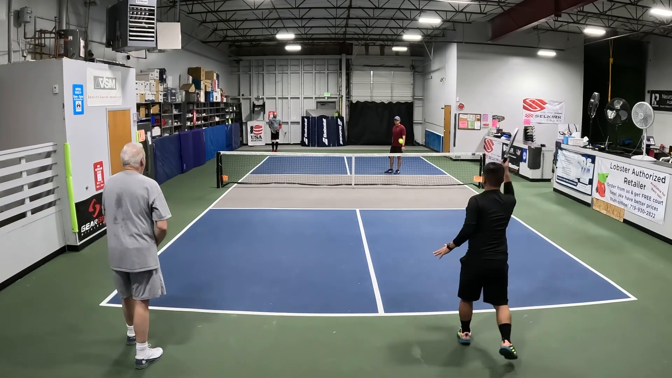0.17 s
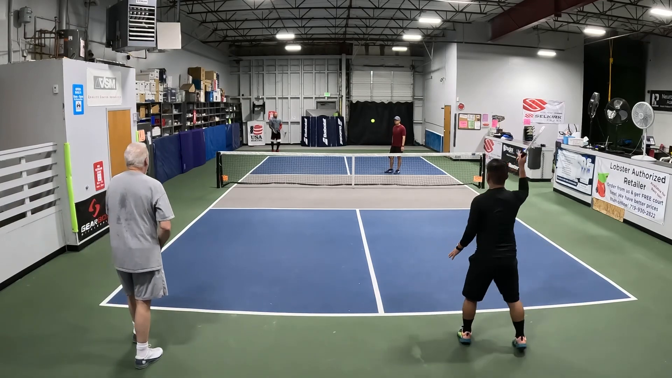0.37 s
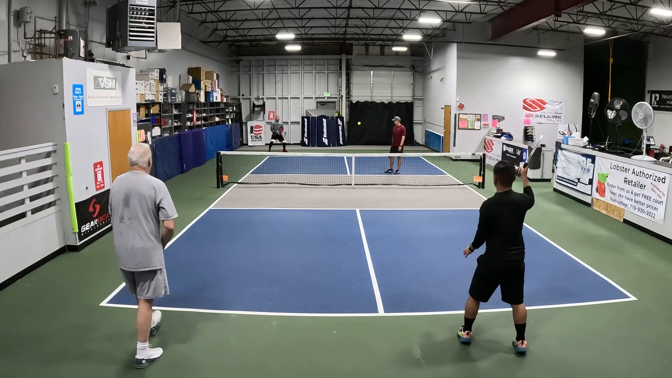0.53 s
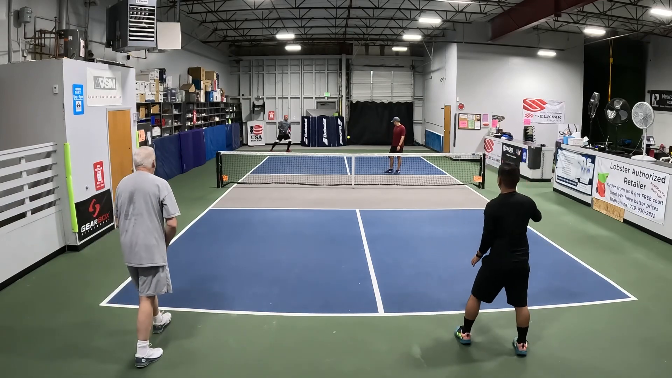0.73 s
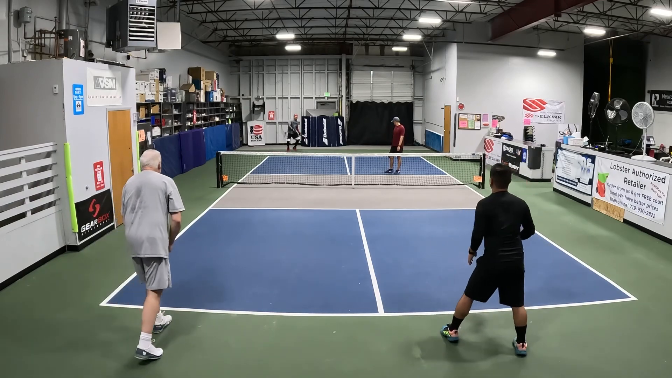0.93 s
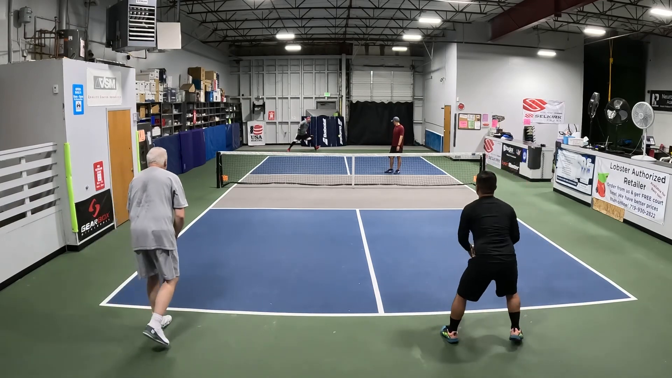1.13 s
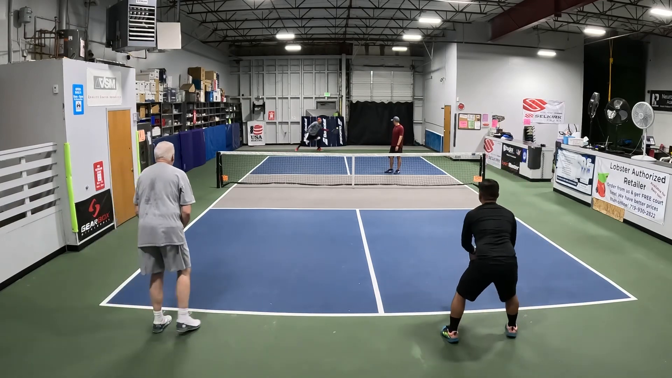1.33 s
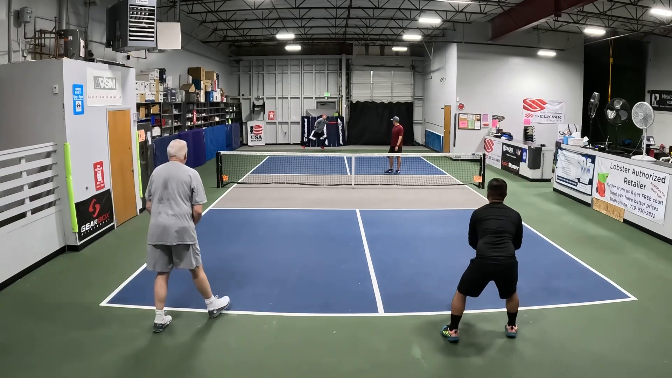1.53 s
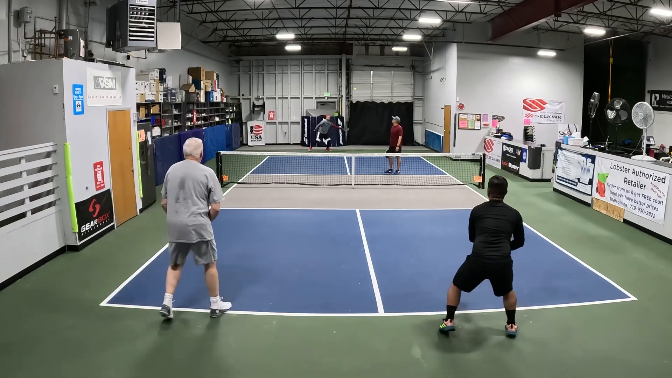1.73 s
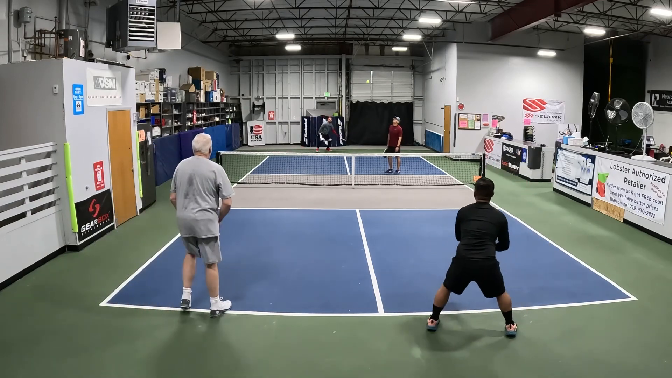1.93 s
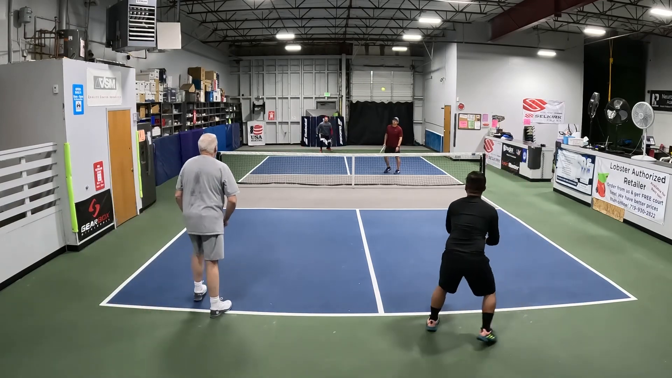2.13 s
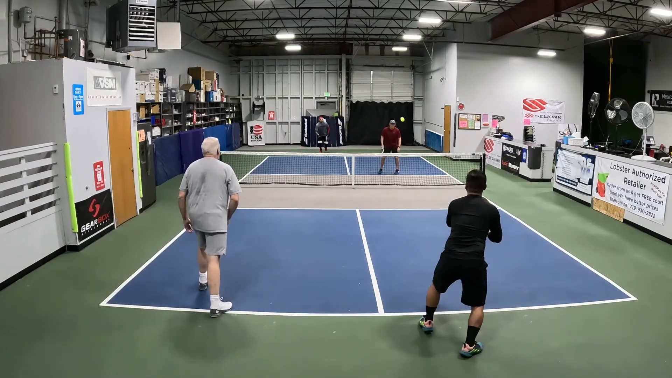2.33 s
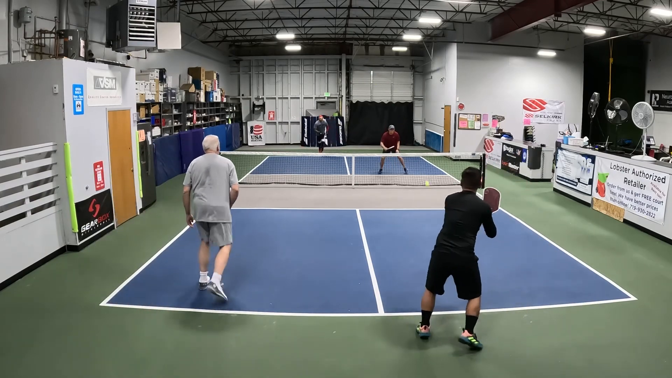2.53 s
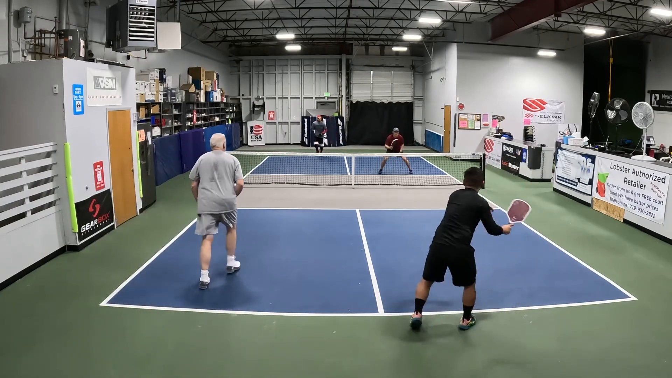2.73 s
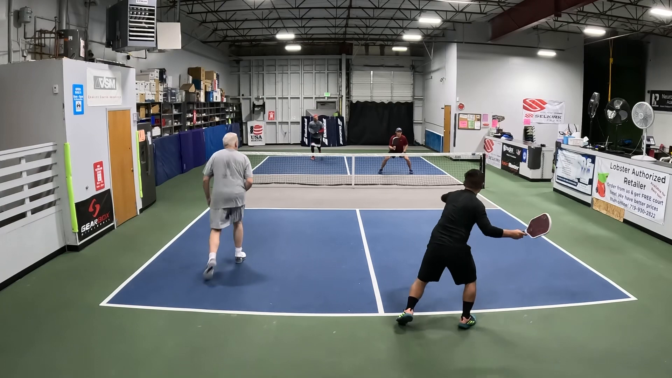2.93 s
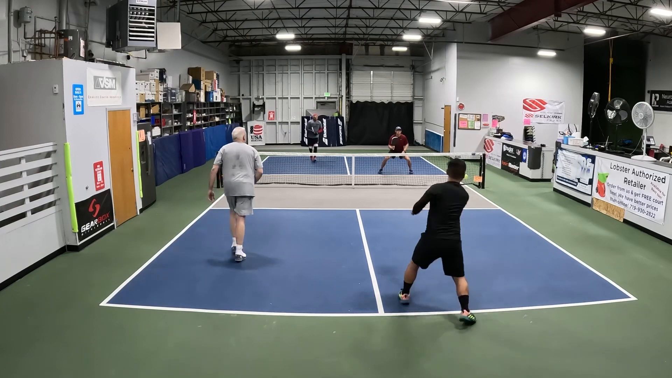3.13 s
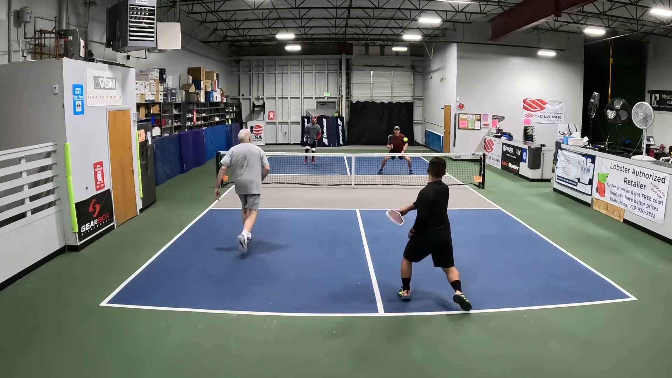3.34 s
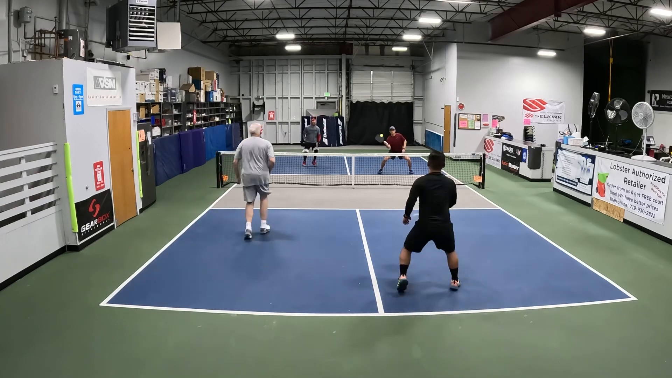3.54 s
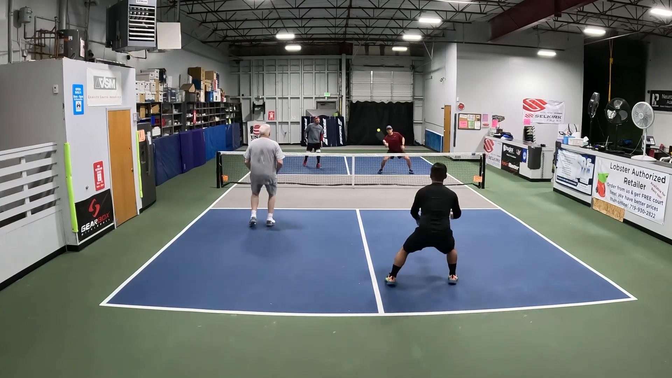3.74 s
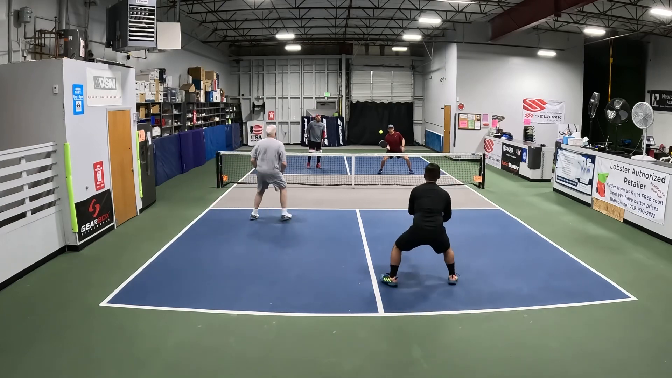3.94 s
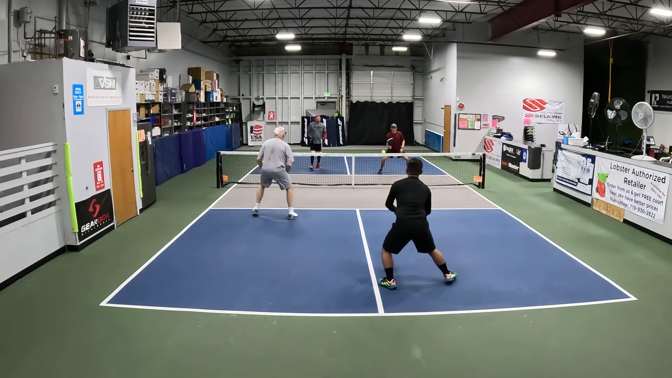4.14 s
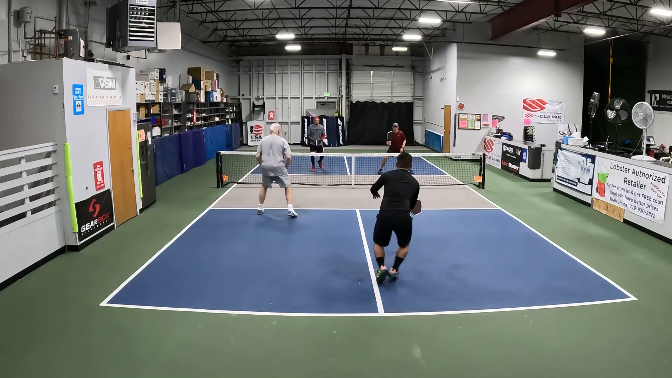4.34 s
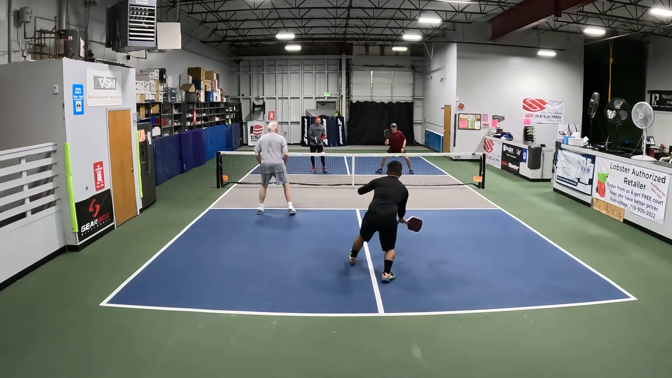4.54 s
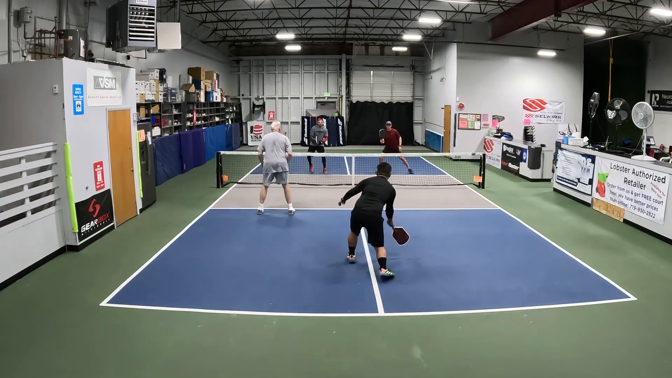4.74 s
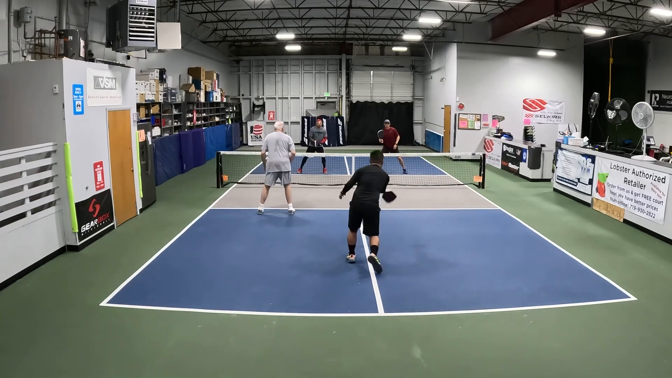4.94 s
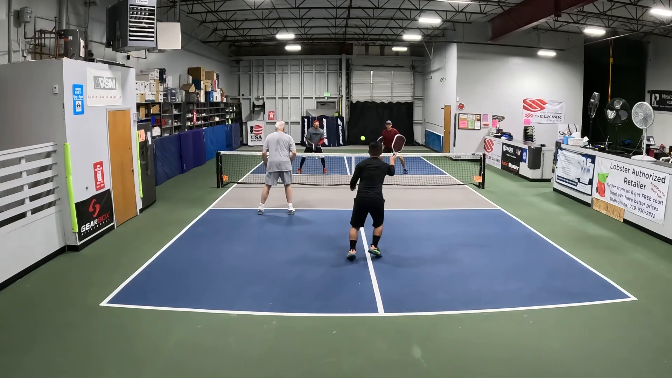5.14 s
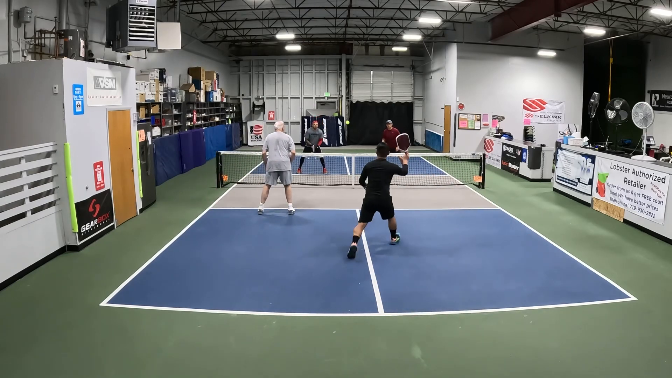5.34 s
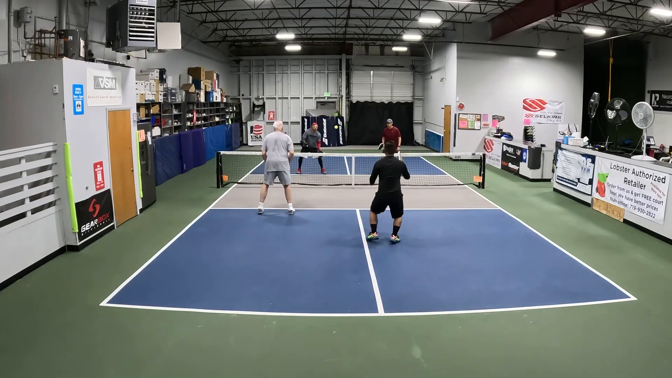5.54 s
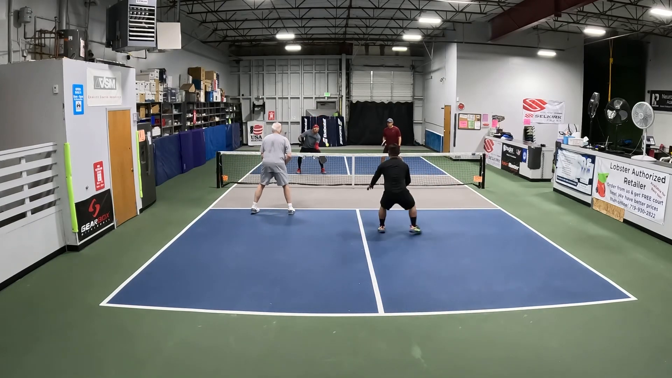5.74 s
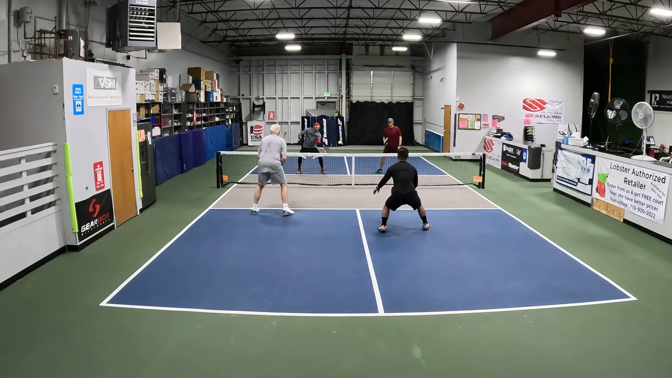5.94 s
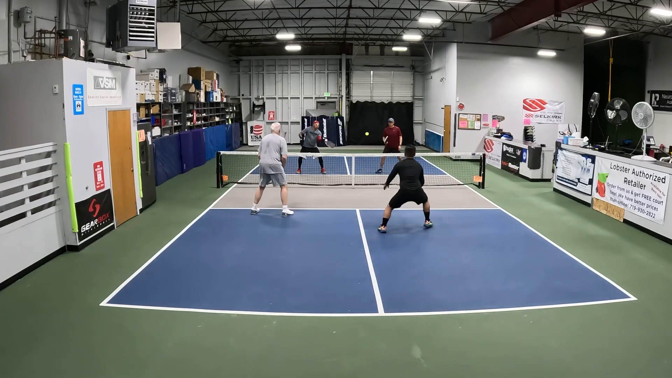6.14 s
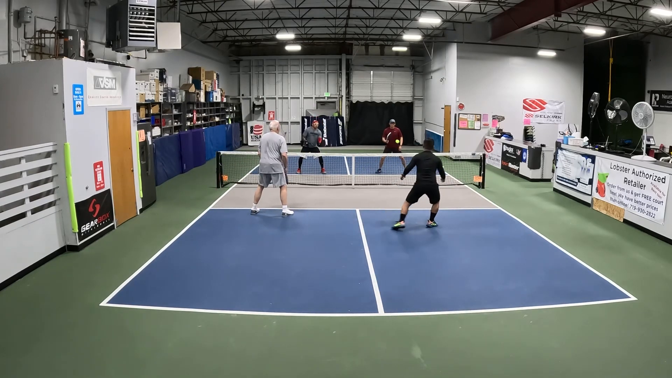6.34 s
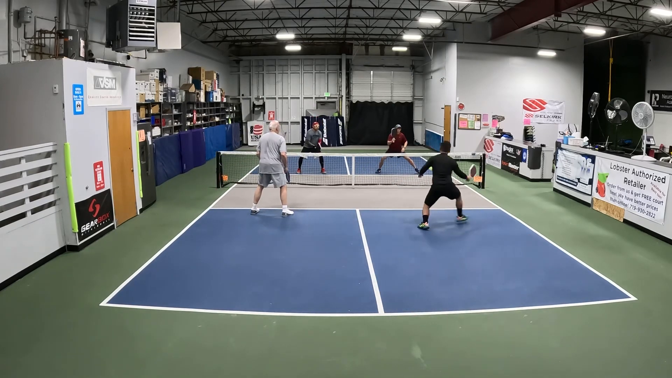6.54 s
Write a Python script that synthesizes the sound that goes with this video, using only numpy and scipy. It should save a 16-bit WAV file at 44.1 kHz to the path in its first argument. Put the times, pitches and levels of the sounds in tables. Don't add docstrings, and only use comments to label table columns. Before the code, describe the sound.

Sharp hollow paddle hits ring through a reverberant steel hall, between softer court bounces, gritty sole scuffs, brief rubber squeaks and steady ventilation noise.

```python
import sys
import numpy as np
from scipy import signal
from scipy.fft import rfft, irfft, next_fast_len
from scipy.io import wavfile
from scipy.ndimage import uniform_filter1d, map_coordinates

SR = 44100
rng = np.random.default_rng(int(sys.argv[2]) if len(sys.argv) > 2 else 0)


def level_to_linear(level):
    exponent = np.asarray(level, float) / 20
    return 10 ** exponent


def store_pcm(level_fs):
    pcm = np.round(np.clip(level_fs, -1, 1) * 32767).astype(np.int16)
    wavfile.write(sys.argv[1], SR, np.atleast_2d(pcm).T)


N = 294588
LEAD, TAIL = 4410, 66150
PAD = 64

# frequency in Hz, level in dB.
RUMBLE = [(12, -7), (20, 1), (58, -8), (120, -9.5), (165, -4.5), (319, -17), (443, -16.5), (687, -36)]
# frequency in Hz, level in dB.
RUSH = [(903, -31), (1040, -17), (1650, -17), (3860, -21.5), (9280, -36), (12200, -63), (14000, -63)]
# time in seconds, level in dB.
TREMBLE = [(0.0, -60), (0.18, -59), (2.71, -57.5), (3.05, -39), (3.09, -35), (3.14, -50), (3.2, -40),
           (3.27, -61), (3.63, -56), (3.66, -50), (3.89, -72), (4.0, -40.5), (4.35, -61.5), (5.82, -53),
           (6.59, -72.5), (6.68, -62)]
# frequency in Hz, level in dB.
MAINS = [(59.2, -59)]
AIR_DB = -57.5

# frequency in Hz, side level in dB.
DIFFUSE_WIDTH = [(60, -6.5), (200, -6), (380, -8.5), (700, -4.5), (1290, -10), (2370, -3.5), (8090, -11),
                 (14900, 6.5)]
# frequency in Hz, time to fall 60 dB in seconds.
HALL_DECAY = [(100, 0.83), (260, 0.96), (700, 0.9), (1800, 1.064), (4800, 1.15), (9000, 0.63),
              (14000, 0.34)]
FILL_DEPTH, LUMPS_DB = 0.71, 1.5

# start in seconds, peak in dB, length in seconds,
# centre in octaves over 2 kHz.
SCUFFS = [(0.34, -23, 0.023, 1.06), (0.495, -26, 0.044, 1.02), (0.828, -34.5, 0.014, 1.9),
          (0.968, -35, 0.058, 1.3), (1.297, -37.5, 0.091, 1.43), (1.832, -29.5, 0.078, 1.42),
          (2.007, -31.5, 0.083, 1.4), (2.1844, -25, 0.045, 1.35), (2.211, -21.5, 0.015, 0.68),
          (2.565, -36.5, 0.03, 1.5), (2.705, -30, 0.042, 1.94), (2.873, -27, 0.053, 1.42),
          (3.322, -31.5, 0.055, 1.84), (3.406, -24, 0.038, 1.52), (3.471, -22, 0.028, 1.47),
          (3.569, -27, 0.12, 1.37), (3.85, -26, 0.035, 1.5), (3.975, -24, 0.042, 1.25),
          (4.149, -34, 0.041, 1.42), (4.221, -39, 0.1, 0.75), (4.351, -31.5, 0.017, 1.53),
          (4.588, -33, 0.05, 1.32), (4.867, -35, 0.13, 1.4), (5.321, -24, 0.045, 1.46),
          (5.53, -28.5, 0.033, 0.67), (5.6047, -24.5, 0.031, 1.74), (5.634, -28, 0.11, 1.3),
          (6.315, -31.5, 0.056, 1.55), (6.458, -30, 0.02, 1.27)]
# start in seconds, level in dB, length in seconds, start pitch in Hz, end pitch in Hz.
SQUEAKS = [(0.483, -48, 0.093, 3735, 4060), (3.169, -25, 0.0086, 3530, 3520),
           (3.426, -33.5, 0.054, 4085, 3600), (3.602, -40, 0.029, 4220, 4180),
           (3.62, -31, 0.007, 4060, 4140), (3.626, -35, 0.0058, 4000, 3900),
           (3.666, -22.5, 0.0214, 2870, 2998), (3.667, -28, 0.0217, 5560, 5960),
           (3.864, -32.5, 0.0422, 3980, 3575), (5.335, -33, 0.014, 4320, 4625),
           (5.352, -39.5, 0.02, 4350, 4770), (5.336, -45.5, 0.044, 4650, 5100)]
# start in seconds, peak in dB, pitch in Hz, slap level in dB.
STEPS = [(0.495, -45.5, 184, 3), (0.696, -44, 126, -1), (0.719, -43.5, 260, -10), (0.54, -52, 190, -20),
         (0.759, -57, 284, -11), (0.848, -46.5, 161, -29), (0.909, -48, 195.7, -23), (1.223, -41, 215, -18),
         (1.261, -44.5, 210, 11.5), (1.282, -38, 260, -4), (1.301, -40, 139, -12), (1.911, -51, 460, -7),
         (2.185, -45, 260, -9), (2.498, -63.5, 133, 14), (2.569, -44, 144, -11), (2.815, -44, 272, -12),
         (2.995, -46, 101, -24), (3.414, -39, 230, 12), (3.443, -34.5, 200, -4), (4.35, -50.5, 296, 7),
         (4.601, -45, 282, -12), (4.72, -65, 170, -22), (5.446, -43.5, 236, 8.5), (5.602, -43, 181, 7),
         (6.315, -44.5, 181, 6.5), (6.356, -61, 182, -9), (6.453, -52, 274, 6), (6.587, -55, 346, 14.5),
         (6.603, -57, 795, -4), (6.659, -48, 254, 6)]
RUB_OCTAVES = 0.69
RUB_HALL_DB, RUB_FAR = -1, 0.39
OVERTONE_DB, SQUEAK_WANDER_HZ = -22, 85
SLAP_HZ = 1293

# start in seconds, peak in dB, left-right in dB, hall level in dB,
# fill time of the hall in seconds.
HITS = [(-.045, -10, -6, 7.5, 0.044), (.977, -27, 1, 10.5, 0.00097), (1.257, -28, 3.5, 4.5, 0.0044),
        (1.407, -7.5, 4.5, 8, 0.029), (2.4195, -28, -5, -3.5, 0.0061), (2.673, -19.5, 2, 6, 0.0014),
        (3.0842, -4, -5.5, 3.5, 0.12), (3.634, -9, 4.5, 7.5, 0.065), (4.4289, -22.5, -6.5, 6.5, 0.0025),
        (4.9132, -12, -5.5, 3.5, 0.025), (5.8499, -11, -6, 8, 0.0036)]
FIRST_WALL_S = [.0135, .006, .007, .005, .006, .0115, .0125, .013, .0105, .012, .005]
KNOCK_LAG_S = [0, .0006, .0003, .0003, .0003, .0007, .0003, .0005, .0007, .0011, .0004]
# start in seconds, peak in dB, pitch in Hz,
# treble tilt of the direct path in dB an octave, air push in dB.
THUMPS = [
    (0.978, -44, 200, -6, -13),
    (1.257, -37, 205, -5.5, -20),
    (1.408, -20.5, 270, -5.5, -25),
    (2.419, -44, 173, -1.5, -18),
    (2.6717, -40, 250, -6, -12),
    (3.082, -31, 295, -6, -14),
    (3.6295, -24, 240, -6.5, -14),
    (4.4276, -36, 191, -8, -17),
    (4.913, -25, 212, -2.5, -28),
    (5.846, -27, 221, 3, -9),
]
# start in seconds, peak in dB, treble tilt in dB an octave.
ECHOES = [(0.009, -11, -18), (0.015, -17, -10), (0.044, -7.5, -14), (0.088, -10.5, -12), (1.005, -23, -10),
          (1.269, -24, -9), (1.413, -10.5, 2.5), (1.417, -4, -9), (1.43, -6, -10), (1.485, -26, -4),
          (2.427, -28.5, 2.5), (2.688, -16.5, -7), (2.696, -23.5, 1), (2.703, -28, 8), (2.717, -24, -9),
          (2.766, -28, -11), (3.087, -9, -3), (3.107, -18, -24), (3.1277, -9.5, -19), (3.157, -10, -23),
          (3.167, -18, -10), (3.187, -11, -4), (3.193, -7, -13), (3.196, -11.5, -8), (3.2, -9, 0),
          (3.226, -23, 14), (3.23, -10.5, -19), (3.238, -11, -5), (3.301, -26, 6), (3.323, -20.5, -10),
          (3.64, -10, -6), (3.644, -5.5, -3), (3.65, -18, -20), (3.689, -9.5, -6.5), (3.694, -14, -13),
          (3.7, -10, -9), (3.706, -8.5, -5), (3.772, -22, -22), (3.786, -18, -6), (4.4386, -21, -2),
          (4.443, -27, 5), (4.4495, -21, 2), (4.469, -29, 2), (4.93, -11, -4.5), (4.937, -15, -3),
          (4.941, -14, -2), (4.976, -31, -15), (5.008, -17.5, -15), (5.013, -15, -18), (5.06, -18.5, -7),
          (5.142, -22, -23), (5.855, -9, -3.5), (5.861, -16, 4), (5.888, -17, -7), (5.912, -12, -7),
          (5.924, -17, 1), (5.929, -15.5, -20), (5.993, -18.5, -25), (6.128, -38, -6)]
# start in seconds, level in dB, pitch in Hz.
SWISH = [
    (3.063, -32, 920),
    (3.073, -20, 950),
    (3.624, -29, 1150),
    (4.902, -28.5, 900),
]
# frequency in Hz, level in dB.
CRACK = [(100, -21), (300, -9.5), (700, -21), (1500, -14), (4000, -19), (7000, -20), (10000, -29),
         (15000, -50.5)]
# frequency in Hz, width in Hz, level in dB.
SERVE = [(427, 57, -6), (973, 34, -5), (1455, 59, -7), (2630, 350, -15), (3670, 87, -19), (5100, 34, -25)]
RETURN = [(418, 56, -6.5), (1083, 26, 1), (1513, 250, -1.5), (2440, 510, -3.5), (3320, 760, -11.5),
          (4590, 100, -16)]
DRIVE = [(415, 54, -8), (968, 39, -4), (1540, 120, -5), (2820, 290, -8), (3470, 150, -12),
         (4630, 160, -16.5), (5750, 45, -18), (6640, 47, -17)]
VOLLEY = [(340, 210, -11), (950, 360, -9), (1390, 79, -3), (1770, 290, -15.5), (2860, 140, -10.5),
          (3480, 120, -10), (4630, 400, -19.5)]
DROP = [(387, 130, -0.5), (900, 130, -4), (1635, 100, -1), (1926, 22, -4.5), (2660, 800, -13),
        (3640, 150, -18), (4370, 220, -15)]
BLOCK = [(205, 21, -8.5), (422, 72, -5), (1054, 38, -9), (1495, 62, -1.5), (1910, 250, -7),
         (2840, 49, -8.5), (3710, 200, -7.5), (4650, 180, -15)]
# frequency in Hz, width in Hz, level in dB.
COURT = [(313, 420, -12), (1036, 180, -11), (1640, 280, -15.5), (2526, 49, -4), (3080, 120, -10),
         (3570, 100, -16.5), (5600, 150, -20), (7500, 250, -14)]
# frequency in Hz, width in Hz, level in dB.
STAMP = [(200, 49, -5), (1075, 290, 0.5), (2560, 120, -8), (4970, 93, -23)]
SLAP = [(200, 400, 6.5), (1050, 250, -0.5), (3100, 1900, 6), (4480, 2400, -2)]
STRUCK = [SERVE, COURT, STAMP, RETURN, SLAP, COURT, DRIVE, VOLLEY, COURT, DROP, BLOCK]
CONTACT_TILT_DB = -0.1
RISE_S, THUMP_LAG_S = .0008, .0036
CONTACT_S, ECHO_SMEAR_S, SMEAR_GROWS = 0.011, 0.027, 1
SOLID_HZ, SOLID_DB = 2240, -0.5
ECHO_SOLID_HZ, ECHO_SOLID_DB = 1490, -3.5
BASS_LAG_HZ, TICK_RISE_S = 503, 0.00013
KNOCK_HZ, KNOCK_WIDTH_HZ, KNOCK_GAIN = 1430, 1500, 0.53
TOP_LOSS_HZ = 13700
ECHO_CROSS, CROSS_S = 1.9, 0.018

# frequency in Hz, side level in dB.
PORT_WIDTH = [(60, -9), (150, -12), (350, -5), (1000, 0)]
# frequency in Hz, left over right in dB.
MIC_DIFFERENCE = [(60, 0.5), (110, -2), (380, 0.5), (700, -3.5), (1290, 2.5), (4380, 0), (8090, 1.5),
                  (14900, 8.5)]
TOP_HZ = 15550


def unit(x):
    return x / np.sqrt(np.mean(x ** 2) + 1e-20)


def along(points, hz):
    f, v = np.transpose(points)
    return np.interp(np.log(hz + 1), np.log(f + 1), v)


def filtered(x, response):
    m = next_fast_len(x.shape[-1] + 8192)
    return irfft(rfft(x, m) * response(np.fft.rfftfreq(m, 1 / SR)), m)[..., :x.shape[-1]]


def left_right(mid, side):
    return np.array([mid + side, mid - side])


def diffuse(size):
    noise = rng.standard_normal((2, size))
    return left_right(*filtered(noise, lambda hz: [1 + 0 * hz, level_to_linear(along(DIFFUSE_WIDTH, hz))]))


def add(track, s, sound, pan_db=0):
    part = track[:, LEAD + round(s * SR):][:, :sound.shape[-1]]
    part += sound[..., :part.shape[1]] * level_to_linear([[pan_db / 2], [-pan_db / 2]])


def fans():
    t = np.arange(N) / SR

    def waver(rate_hz):
        return map_coordinates(rng.standard_normal(150), [t * rate_hz])

    air = unit(filtered(diffuse(N), lambda hz: level_to_linear(along(RUMBLE + RUSH, hz))))
    deep = filtered(air, lambda hz: 1 / (1 + (hz / 85) ** 6))
    rumble = filtered(air, lambda hz: 1 / (1 + (hz / 300) ** 4))
    shake_db = np.interp(t, *np.transpose(TREMBLE))
    shaken = rumble + (level_to_linear(shake_db - shake_db.mean()) - 1) * deep
    lumps = level_to_linear(4.1 * waver(6) + 0.75 * waver(32))
    rush = level_to_linear(2.1 * waver(6.4) + 1.2 * waver(20)) * (air - rumble)
    hum = 0
    for hz, db in MAINS:
        hum = hum + level_to_linear(db + 2.0 + 2.9 * waver(17)) * np.sin(2 * np.pi * hz * t + 0.88 * waver(6.1))
    return level_to_linear(AIR_DB + 4.0) * (rush + lumps * shaken) + hum


def hall(x, gap, fill):
    hz, t, z = signal.stft(diffuse(TAIL), SR, nperseg=256)
    lumps = level_to_linear(LUMPS_DB * np.exp(-t / 0.15) * rng.standard_normal(len(t)))
    decay = level_to_linear(-60 * t / along(HALL_DECAY, hz)[:, None])
    tail = signal.istft(z * lumps * decay, SR, nperseg=256)[1]
    t = np.arange(tail.shape[1]) / SR - gap
    tail = tail * (t > 0) * (1 - FILL_DEPTH * np.exp(-np.abs(t) / fill))
    return signal.fftconvolve(np.atleast_2d(x), tail / np.linalg.norm(tail[0]), axes=1)


def scuff(t, db, length, centre):
    def band(hz):
        octaves = np.log2(hz / 2000 + 1e-3) - centre
        return np.exp(-(octaves / RUB_OCTAVES) ** 2 / 2) / (1 + (hz / 12000) ** 6)

    grit = rng.standard_normal(len(t)) * level_to_linear(1.3 * rng.standard_normal(len(t)))
    envelope = (1 - np.exp(-t / 0.0081)) * np.exp(-(t / length) ** 2)
    return level_to_linear(db - 16.0) * unit(filtered(grit, band)) * envelope


def squeak(t, db, length, start_hz, end_hz):
    fast = unit(uniform_filter1d(rng.standard_normal(len(t)), size=60))
    slow = unit(uniform_filter1d(rng.standard_normal(len(t)), size=250))
    glide_hz = np.interp(t, [0, length], [start_hz, end_hz])
    phase = 2 * np.pi * np.cumsum(glide_hz + SQUEAK_WANDER_HZ * (fast + .5 * slow)) / SR
    tone = np.sin(phase) + level_to_linear(OVERTONE_DB) * np.sin(2 * phase)
    return level_to_linear(db) * tone * np.sin(np.pi * np.clip(t / length, 0, 1)) ** .5


def step(t, db, hz, slap_db):
    thud = np.sin(2 * np.pi * hz * t) * level_to_linear(-60 * t / 0.031) * (1 - np.exp(-t / 0.00096))
    burst = rng.standard_normal(len(t)) * level_to_linear(-60 * t / 0.03)
    slap = filtered(burst, lambda f: np.exp(-1.8 * np.log2(f / SLAP_HZ + 1e-3) ** 2))
    return level_to_linear(db + 7.5) * thud + level_to_linear(db + slap_db + 8.0) * slap


def shoes():
    rubs, rub_send, near = np.zeros((3, 2, N + LEAD))
    t = np.arange(SR // 4) / SR
    for s, db, length, centre in SCUFFS:
        rub = scuff(t, db, length, centre)
        add(rubs, s, rub)
        add(rub_send, s, level_to_linear(RUB_HALL_DB - RUB_FAR * (db + 30.0)) * rub)
    for s, *settings in SQUEAKS:
        add(near, s, squeak(t, *settings))
    for s, *settings in STEPS:
        add(near, s, step(t, *settings))
    return rubs + near + level_to_linear(3.0) * hall((rub_send + near)[0], 0.00086, 0.0032)[:, :N + LEAD]


def blow(rings, tilt_db, size=2048):
    hz = np.fft.rfftfreq(size, 1 / SR)
    power = level_to_linear(2 * along(CRACK, hz))
    for centre, width, db in rings:
        power = power + level_to_linear(2 * db) / (1 + (2 * (hz - centre) / np.hypot(width, 230)) ** 2) ** 2
    power = power * level_to_linear(2 * tilt_db * np.log2(1 + hz / 3000))
    cepstrum = irfft(np.log(power) / 2)
    cepstrum[1:size // 2] *= 2
    cepstrum[size // 2 + 1:] = 0
    pulse = irfft(np.exp(rfft(cepstrum)))[:size // 2]
    return pulse / np.abs(pulse).max()


def smeared(pulse, t60, tilt_db, solid_hz, solid_db, lag_s=0):
    def resonance(f, hz, width_hz):
        return 1j * f * width_hz / (hz ** 2 - f * f + 1j * f * width_hz)

    def aim(f):
        lag = (BASS_LAG_HZ - 1j * f) / (BASS_LAG_HZ + 1j * f) * np.exp(-2j * np.pi * f * lag_s)
        return lag * (1 + KNOCK_GAIN * resonance(f, KNOCK_HZ, KNOCK_WIDTH_HZ))

    def path(f):
        treble = level_to_linear(tilt_db * np.log2(1 + f / 2500)) / (1 + (f / TOP_LOSS_HZ) ** 8)
        return treble * (1 - .6 * resonance(f, 660, 350))

    t = np.arange(900) / SR
    burst = rng.standard_normal(len(t)) * level_to_linear(-60 * t / t60) * (1 - np.exp(-t / TICK_RISE_S))
    high = filtered(pulse, lambda f: 1j * f / (solid_hz + 1j * f))
    knock = level_to_linear(solid_db) * filtered(pulse - high, aim)
    tick = np.convolve(high, burst / np.linalg.norm(burst))[:len(pulse)]
    out = filtered(np.pad(knock + tick, (PAD, 0)), path)
    return out / np.abs(out).max()


def pocks(track, pulses):
    tilts = [0] + [row[3] for row in THUMPS]
    for hit, pulse, tilt_db, gap, lag_s in zip(HITS, pulses, tilts, FIRST_WALL_S, KNOCK_LAG_S):
        s, db, pan_db, hall_db, fill = hit
        direct = smeared(pulse, CONTACT_S, tilt_db, SOLID_HZ, SOLID_DB, lag_s)
        add(track, s - .0003 - PAD / SR, level_to_linear(db + 4) * direct, pan_db)
        add(track, s, level_to_linear(db + hall_db + 7.5) * hall(pulse, gap, fill))


def thumps(track):
    t = np.arange(3000) / SR
    for s, db, hz, _, push_db in THUMPS:
        thump = level_to_linear(db + 4.5 - 60 * t / 0.066) * np.sin(2 * np.pi * hz * t)
        add(track, s + THUMP_LAG_S, thump + level_to_linear(-10.0) * hall(thump, 0.023, 0.039)[:, :len(t)])
        add(track, s + THUMP_LAG_S, level_to_linear(db + push_db) * t / 0.0061 * np.exp(-t / 0.0054))


def echoes(track, pulses):
    starts = [row[0] for row in HITS]
    for s, db, tilt_db in ECHOES:
        k = np.searchsorted(starts, s) - 1
        delay = s - starts[k]
        pan_db = -ECHO_CROSS * HITS[k][2] * np.exp(-delay / CROSS_S)
        t60 = min(ECHO_SMEAR_S + SMEAR_GROWS * delay, .03)
        echo = smeared(pulses[k], t60, tilt_db, ECHO_SOLID_HZ, ECHO_SOLID_DB)
        add(track, s + RISE_S - PAD / SR, level_to_linear(db - 4.0) * echo, pan_db)


def swishes(track):
    t = np.arange(500) / SR
    for s, db, hz in SWISH:
        add(track, s, level_to_linear(db - 60 * t / .03) * (1 - np.exp(-t / .002)) * np.sin(2 * np.pi * hz * t))


def ball():
    track = np.zeros((2, N + LEAD))
    pulses = [blow(rings, CONTACT_TILT_DB) for rings in STRUCK]
    pocks(track, pulses)
    thumps(track)
    echoes(track, pulses)
    swishes(track)
    return track


def scene():
    return fans() + (shoes() + ball())[:, LEAD:]


def low_pass(x):
    return signal.sosfilt(signal.butter(12, 15530, fs=SR, output="sos"), x)


def record(dry):
    middle_side = np.array([dry[0] + dry[1], dry[0] - dry[1]]) / 2
    mid, side = filtered(middle_side, lambda hz: [1 + 0 * hz, level_to_linear(along(PORT_WIDTH, hz))])
    heard = filtered(left_right(mid, side), lambda hz: level_to_linear(along(MIC_DIFFERENCE, hz) * [[.5], [-.5]]))
    heard = heard / (1 + np.abs(heard / .93) ** 6) ** (1 / 6)
    mix = filtered(heard, lambda hz: hz < TOP_HZ)
    return low_pass(mix)


dry = scene()
out = record(dry)
store_pcm(out)
```